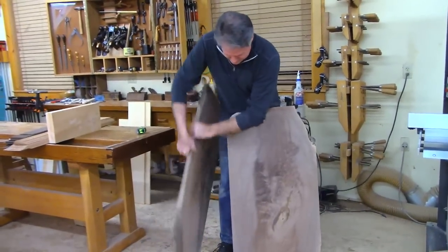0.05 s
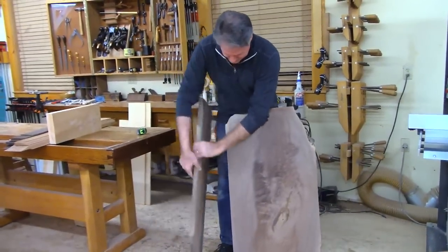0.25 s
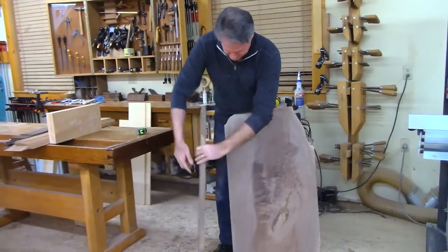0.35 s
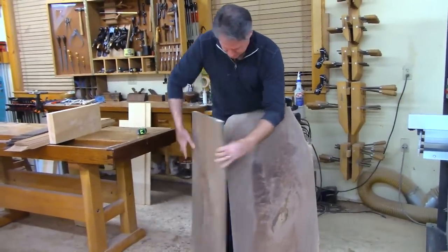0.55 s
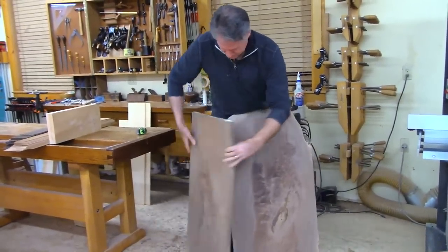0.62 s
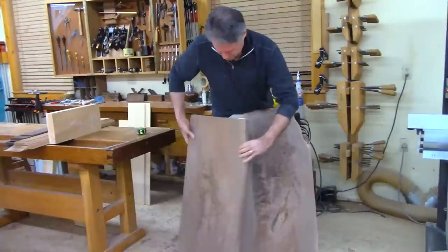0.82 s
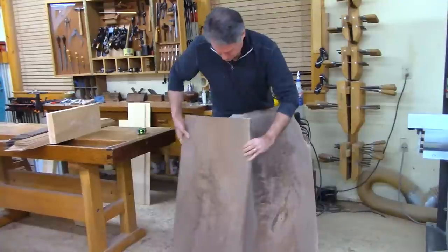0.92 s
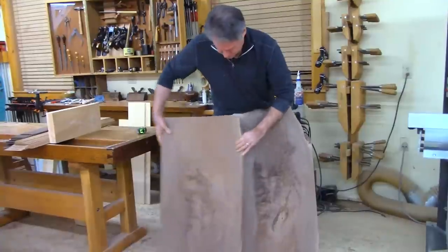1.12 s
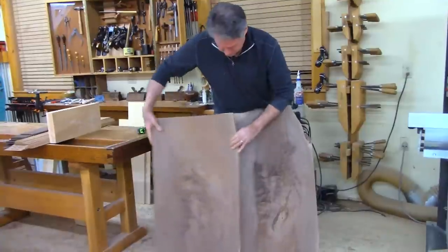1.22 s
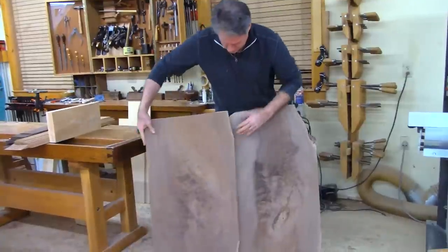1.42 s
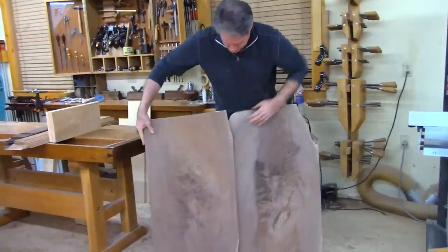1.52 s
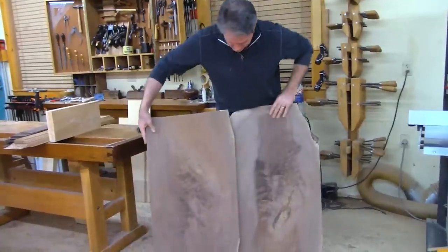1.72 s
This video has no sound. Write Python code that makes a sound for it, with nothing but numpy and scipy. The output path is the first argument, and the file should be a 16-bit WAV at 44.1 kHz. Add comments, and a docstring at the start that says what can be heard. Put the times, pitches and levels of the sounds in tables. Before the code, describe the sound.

A heavy wooden slab lands with a deep juddering thud, knocks on its corner, rumbles and softly swishes as it pivots, then clacks sharply against a second slab; quiet lively workshop, mono microphone.

```python
"""Heavy slab in a workshop

A heavy wooden slab is walked round on a workshop floor and set against a second slab, in mono.
After faint echoes of an earlier blow it lands with a deep thud, knocks on a corner, rumbles and
swishes under the hands as it pivots, then clacks against its neighbour and rebounds. Short pushes
ring modes and a noisy wash; the room swells behind each, over steady filtered-noise workshop air."""
import sys
import numpy as np
from scipy import signal
from scipy.fft import rfft, irfft
from scipy.io import wavfile
from scipy.ndimage import uniform_filter1d, minimum_filter1d

SR = 44100
rng = np.random.default_rng(int(sys.argv[2]) if len(sys.argv) > 2 else 0)


def wav_record(signal):
    """Record a signal, one row per channel, as 16-bit PCM in the file named by sys.argv[1]."""
    frames = np.transpose(np.atleast_2d(signal))
    bounded = np.clip(frames, -1, 1)
    # unit amplitude maps onto the largest positive 16-bit level
    quanta = np.round(bounded * 32767).astype(np.int16)
    wavfile.write(sys.argv[1], SR, quanta)


N = 77175
T = np.arange(N) / SR
RING = T[:SR]  # the first second, long enough for one blow


def amp(db):
    """Decibels to gain."""
    return 10 ** (np.asarray(db) / 20)


def unit(x):
    """Scales to an rms of one."""
    return x / np.sqrt(np.mean(x ** 2) + 1e-20)


def read(points, hz):
    """Reads a table on a log-frequency axis."""
    f, value = np.transpose(points)
    return np.interp(np.log(hz + 1), np.log(f + 1), value)


def level(points):
    """Draws a level/dB curve over the whole scene."""
    return np.interp(T, *np.transpose(points))


def add(mix, s, sound):
    """Mixes a sound in at a time in seconds."""
    part = mix[round(s * SR):][:len(sound)]
    part += sound[:len(part)]


def colour(x, spectrum, size=8192):
    """Filters causally, at minimum phase and unit energy, to the given spectrum."""
    hz = abs(np.fft.fftfreq(size, 1 / SR))
    log_gain = np.log(amp(read(spectrum, hz)))
    # the Hilbert transform of the log gain supplies the minimum phase
    response = np.exp(np.conj(signal.hilbert(log_gain)))
    taps = np.fft.ifft(response).real[:size // 2]
    return signal.fftconvolve(x, taps / np.linalg.norm(taps))[:len(x)]


def noise(spectrum):
    """Steady noise of unit rms with the given spectrum."""
    white = rfft(rng.standard_normal(N))
    gain = amp(read(spectrum, np.fft.rfftfreq(N, 1 / SR)))
    return unit(irfft(white * gain, N))


def tail(t60s, size=256):
    """Dense ringing, even across frequency, each band dying at its own speed."""
    hz, t, z = signal.stft(rng.standard_normal(SR), SR, nperseg=size)
    t60 = np.maximum(read(t60s, hz), .01)[:, None]
    z = z / (abs(z) + 1e-12) * amp(-60 * t / t60)  # random phases, even magnitudes
    out = signal.istft(z, SR, nperseg=size)[1][:SR]
    return out / np.linalg.norm(out)


# decay of the workshop's answer (f/Hz, t60/s)
ROOM_DECAY = [(60, 0.54), (140, 0.26), (230, 0.5), (450, 0.64), (1100, 0.55), (2900, 0.61), (8000, .5)]
# decay of the slab's wash, before each kind of blow divides it by its damping (f/Hz, t60/s)
SLAB_DECAY = [(60, 0.22), (300, 0.21), (1000, 0.088), (3000, 0.046), (10000, 0.051)]
ROOM_RISE_S = 0.0066  # time constant of the room's swell


def blows(events, modes, body, modes_db, push_db, body_db, room_db, attack_s, damping):
    """Each brief push rings the modes and a noisy wash, and the room swells behind them."""
    rise = 1 - np.exp(-RING / attack_s)
    swell = 1 - np.exp(-RING / ROOM_RISE_S)
    ring = np.zeros(len(RING))
    for hz, db, t60 in modes:
        ring += rise * amp(db - 60 * RING / t60) * np.sin(2 * np.pi * hz * RING)
    slab_decay = [(hz, t60 / damping) for hz, t60 in SLAB_DECAY]

    force, broad = np.zeros(N), np.zeros(N)
    for s, db, contact_ms in events:
        t = RING[:1024]
        push = t * np.exp(-t / (contact_ms / 4000))  # peaks a quarter of the contact time in
        push = amp(db) * push / push.sum()
        wash = amp(body_db) * rise * tail(slab_decay)
        room = amp(room_db) * swell * tail(ROOM_DECAY, size=512)
        add(force, s, push)
        add(broad, s, signal.oaconvolve(wash + room, push))

    ringing = amp(modes_db) * signal.fftconvolve(force, ring)[:N]
    return ringing + colour(amp(push_db) * force + broad, body)


# a faint echo of an earlier blow, then the slab landing and juddering on the floor
# (t/s, level/dB, contact time/ms)
THUD_EVENTS = [(.047, -43, 0.43), (.2435, -10.5, 0.34), (.2535, 1, 0.55), (.270, -9, 0.27),
               (.300, -3.5, 0.52), (.326, -5.5, 0.53), (.345, -11, 0.89)]
# strong modes of the thuds (f/Hz, level/dB, t60/s)
THUD_RINGING = [(71.2, 3, 0.27), (91.5, -9, 0.27), (107, 2, 0.17), (126.7, 4, 0.29), (165, 1.5, 0.19),
                (205.3, 3.5, 0.233), (295, -7, 0.47), (413, -7.5, 0.32)]
# spectrum of contact, wash and room under them (f/Hz, level/dB per Hz)
THUD_WASH = [(25, -22.5), (65, -1.5), (160, -8), (400, -13.5), (650, -12.5), (900, -11), (1300, -11),
             (2000, -21), (3000, -22), (6000, -22.5), (9500, -20), (15000, -26)]


def thuds():
    """After a faint echo of an earlier blow, the slab lands and judders, ringing its deep modes."""
    return blows(THUD_EVENTS, THUD_RINGING, THUD_WASH, modes_db=-15.5, push_db=9,
                 body_db=19.5, room_db=18, attack_s=0.0017, damping=0.91)


# a faint dying echo of an earlier blow, then corner knocks (t/s, level/dB, contact time/ms)
KNOCK_EVENTS = [(.002, -37, 0.18), (.6125, -14, 0.47), (.6162, 0.5, 0.2), (.642, -10.5, 0.77),
                (.663, -9.5, 0.92), (.702, -12.5, 0.62), (.834, -21, 0.51), (.996, -34, 0.14)]
# strong modes of the knocks (f/Hz, level/dB, t60/s)
KNOCK_RINGING = [(117, -5, 0.1), (192.6, -14.5, 0.34), (278.4, -12, 0.27), (362, 1.5, 0.11), (455, 1, 0.22),
                 (519, 7.5, 0.072), (645, -3, 0.11), (687, -10, 0.2), (772, -8.5, 0.23), (1050, -25, .17),
                 (1240, -18, 0.083)]
# spectrum of contact, wash and room under them (f/Hz, level/dB per Hz)
KNOCK_WASH = [(30, -9), (110, -25), (210, -20), (300, 2), (480, 0.5), (760, -2.5), (950, -10.5),
              (1500, -11.5), (2000, -26.5), (3200, -28.5), (6000, -36.5), (10000, -27.5), (15000, -82)]


def knocks():
    """After a faint dying echo of an earlier blow, corner knocks ring the slab's middle modes."""
    return blows(KNOCK_EVENTS, KNOCK_RINGING, KNOCK_WASH, modes_db=-13.5, push_db=2.5,
                 body_db=9, room_db=12, attack_s=0.00093, damping=0.79)


# sharp edge clacks (t/s, level/dB, contact time/ms)
CLACK_EVENTS = [(.2405, -10.5, 0.29), (1.3870, -9.5, .12), (1.3907, -4, 0.068), (1.39655, -4, 0.081),
                (1.444, -11, 0.1), (1.467, -5.5, 0.62)]
# strong modes of the slab struck on its edge (f/Hz, level/dB, t60/s)
CLACK_RINGING = [(158.5, -15.5, 0.27), (246.7, -15, 0.14), (325, -12, 0.13), (394.4, -14.5, 0.3),
                 (547.6, 1, 0.16), (598, -14.5, 0.24), (676, 1.5, 0.12), (838, -15.5, .14),
                 (916, -15.5, 0.1), (1034.5, -0.5, 0.077), (1200, -12.5, 0.19), (1500, -29, 0.15),
                 (1763, -23, 0.17)]
# spectrum of contact, wash and room under them (f/Hz, level/dB per Hz)
CLACK_WASH = [(30, -35), (90, -22), (160, -14.5), (270, -15), (450, -6), (570, -4), (690, -5.5), (780, -3),
              (1030, -4.5), (1350, -10), (1900, -23.5), (2300, -29.5), (3200, -39), (4500, -46),
              (8000, -54), (15000, -54.5)]


def clacks():
    """Sharp edge contacts, mostly very short, ring the slab's higher modes."""
    return blows(CLACK_EVENTS, CLACK_RINGING, CLACK_WASH, modes_db=-8, push_db=10.5,
                 body_db=17, room_db=15, attack_s=0.00096, damping=1.44)


# soft bumps as the weight rocks over the lower edge (t/s, level/dB, contact time/ms)
BUMP_EVENTS = [(.808, -13, 0.96), (.835, 0.5, 4.2), (.905, -30, 0.67), (1.015, -12, 2), (1.115, -17, 3),
               (1.22, -15.5, 2.6), (1.305, -18.5, 3.8)]
# strong low modes of the rocking slab (f/Hz, level/dB, t60/s)
BUMP_RINGING = [(53, 5.5, 0.13), (75.3, -10, 0.21), (102, 3.5, 0.114)]
# spectrum of contact, wash and room under them (f/Hz, level/dB per Hz)
BUMP_WASH = [(20, -23), (55, 0), (110, -4), (200, -18), (500, -17), (2000, -67.5), (15000, -70.5)]


def bumps():
    """The rocking weight presses softly, mostly in long contacts that ring only low modes."""
    return blows(BUMP_EVENTS, BUMP_RINGING, BUMP_WASH, modes_db=-20.5, push_db=-4,
                 body_db=-5.5, room_db=0, attack_s=0.0023, damping=0.57)


# low rumble of the lower edge on the floor (t/s, level/dB)
RUMBLE_CURVE = [(0, -59), (.22, -58), (.58, -45), (.68, -33.5), (.78, -31.5), (.9, -24.5), (1.04, -38.5),
                (1.08, -44), (1.13, -39.5), (1.3, -35.5), (1.42, -40), (1.55, -42.5), (1.75, -58.5)]
# its steady spectrum (f/Hz, level/dB per Hz)
RUMBLE_SPECTRUM = [(15, -6), (32, 7), (65, 2), (105, -13.5), (170, -12), (260, -35.5), (1000, -25.5),
                   (4000, -62)]


def rumble():
    """The lower edge rolls on the floor: low noise following the pivot's level."""
    return noise(RUMBLE_SPECTRUM) * amp(level(RUMBLE_CURVE))


# hands sliding over the wood, before the grain's flutter (t/s, level/dB)
SWISH_CURVE = [(0, -67.5), (.2, -60), (.42, -51.5), (.58, -56.5), (.79, -59), (.89, -46.5), (1.02, -49),
               (1.12, -54), (1.27, -55.5), (1.44, -59), (1.54, -71.5), (1.63, -89), (1.73, -61)]
# its steady spectrum (f/Hz, level/dB per Hz)
SWISH_SPECTRUM = [(100, -29), (500, 14.5), (1200, -11), (2000, 0.5), (3200, -5.5), (4050, 4), (5000, -3),
                  (6800, -6), (8300, -2.5), (9700, 0), (11200, -7), (13500, -8.5), (15500, -17)]


def swish():
    """Hands slide over the grain: noise whose level flutters by 1 dB rms."""
    grain_db = 1.0 * unit(uniform_filter1d(rng.standard_normal(N), size=300))
    return noise(SWISH_SPECTRUM) * amp(level(SWISH_CURVE) + grain_db)


# tiny bright ticks (t/s, level/dB)
TICK_EVENTS = [(0.539, -43)]
# their spectrum (f/Hz, level/dB per Hz)
TICK_SPECTRUM = [(1000, -30), (6000, -25), (8500, -10), (11000, 6), (15000, -15)]
TICK_T60 = .015  # s


def tick():
    """A tiny bright tick, like grit under the slab: a fast-dying burst of noise."""
    out = np.zeros(N)
    for s, db in TICK_EVENTS:
        add(out, s, noise(TICK_SPECTRUM) * amp(db - 60 * T / TICK_T60))
    return out


# quiet workshop air (f/Hz, level/dB per Hz)
AIR_SPECTRUM = [(20, -5), (70, -1), (140, 4), (300, 0.5), (700, -4), (1400, -2.5), (2100, -13.5),
                (4000, -16.5), (7000, -19.5), (15000, -26.5)]
AIR_DB = -54  # rms level


def air():
    """The workshop's background: steady noise, strongest in the lows."""
    return amp(AIR_DB) * noise(AIR_SPECTRUM)


def scene():
    """All the blows, the pivoting and the quiet workshop air, on one channel."""
    struck = thuds() + knocks() + clacks() + bumps()
    pivot = rumble() + swish()
    return (struck + pivot + tick() + air())[None]


LOW_CUT_HZ, EDGE_HZ = 40, 15800  # the microphone's low cut, the upper band limit
CEILING = .88  # limiter threshold, full scale = 1


def record(dry):
    """The microphone's low cut, a smooth peak limiter, then the band limit."""
    low_cut = signal.butter(2, LOW_CUT_HZ, "high", fs=SR, output="sos")
    x = signal.sosfilt(low_cut, dry)
    gain = np.minimum(1, CEILING / (abs(x) + 1e-9))
    gain = minimum_filter1d(gain, size=301)  # holds the gain down around each peak
    smooth_gain = uniform_filter1d(uniform_filter1d(gain, size=151), size=151)
    band_limit = signal.firwin(511, EDGE_HZ, window=("kaiser", 9), fs=SR)
    return signal.oaconvolve(x * smooth_gain, band_limit[None], "same")


dry = scene()
out = record(dry)
wav_record(out)
```